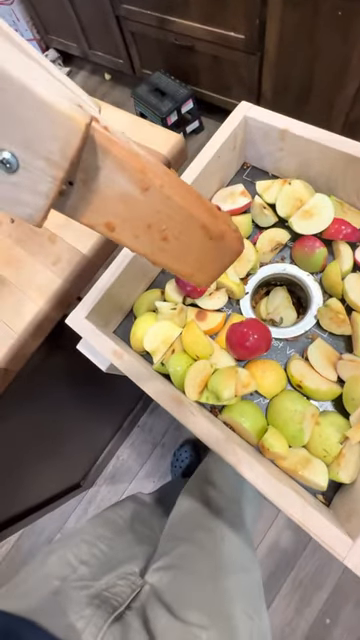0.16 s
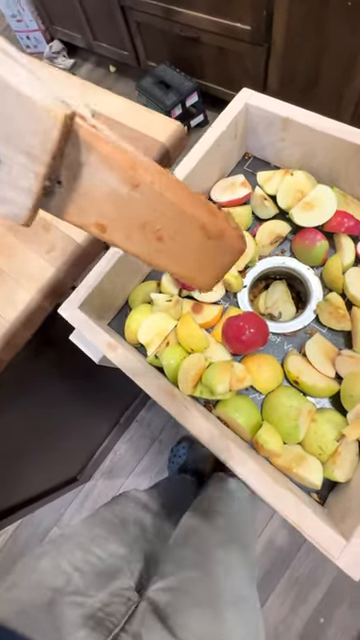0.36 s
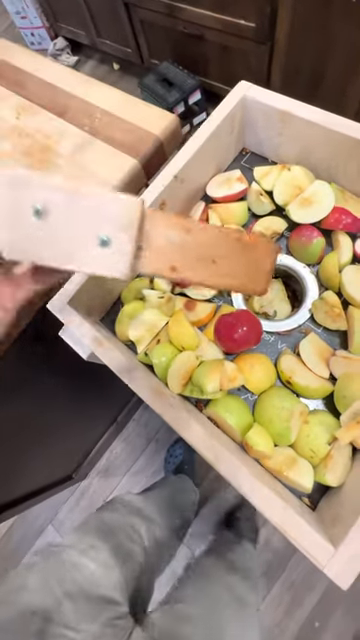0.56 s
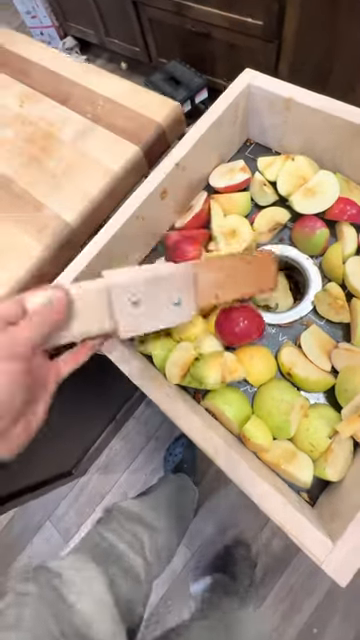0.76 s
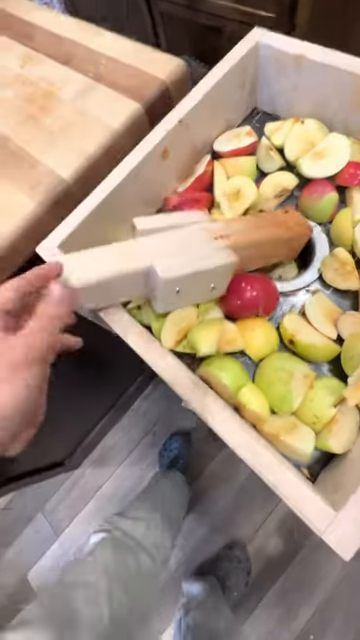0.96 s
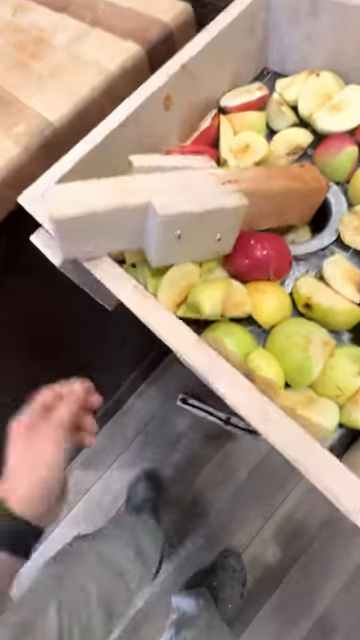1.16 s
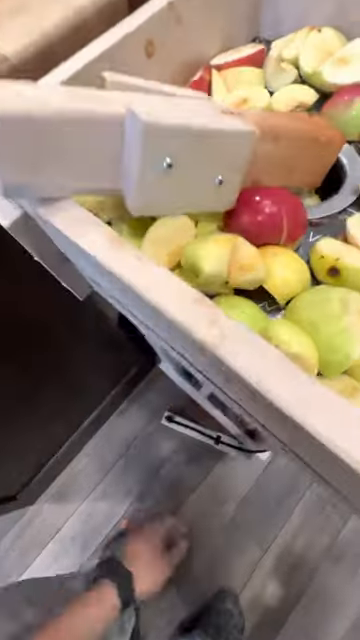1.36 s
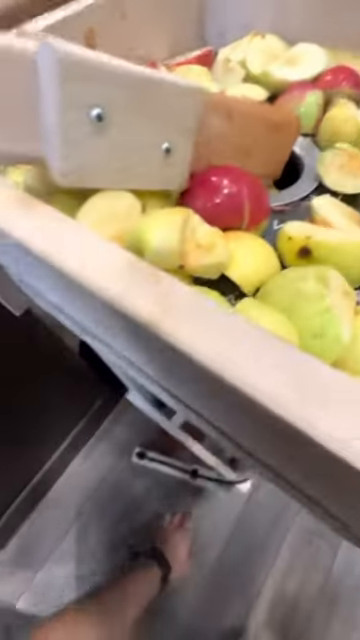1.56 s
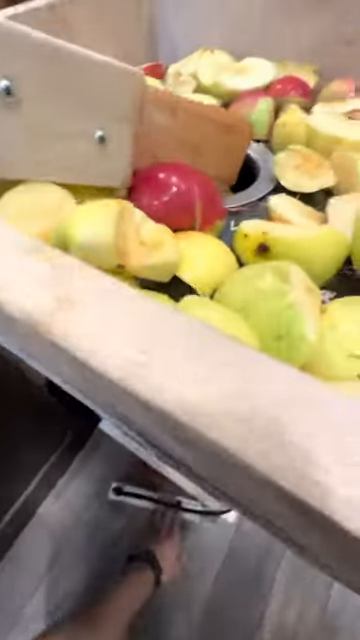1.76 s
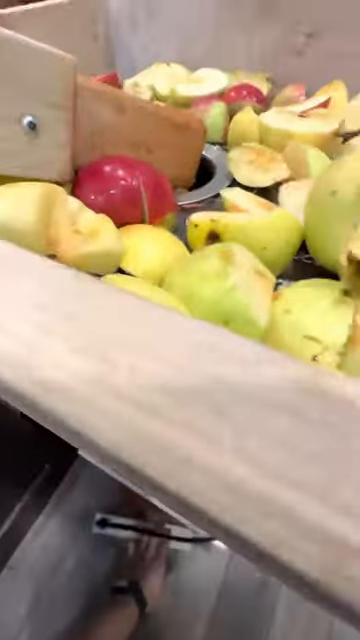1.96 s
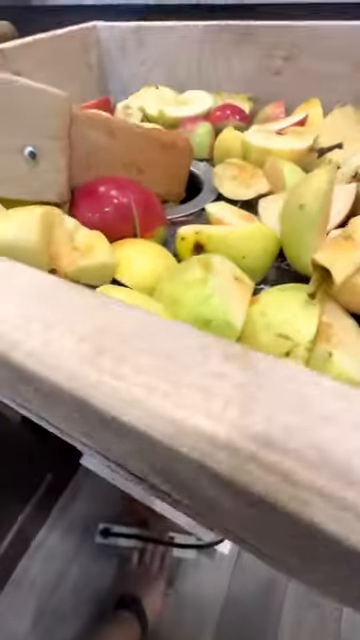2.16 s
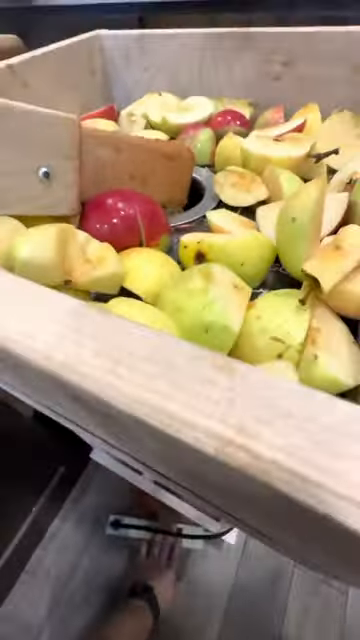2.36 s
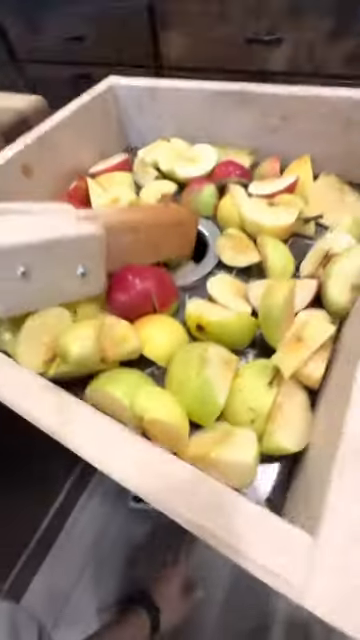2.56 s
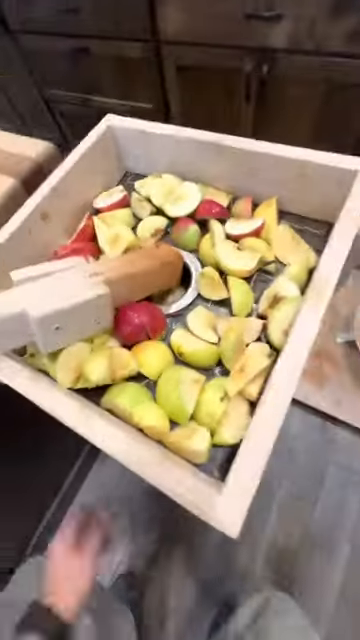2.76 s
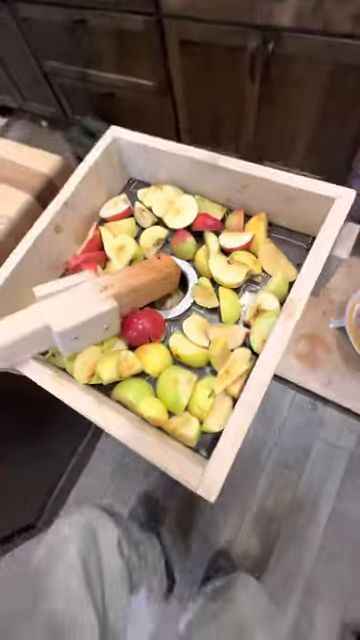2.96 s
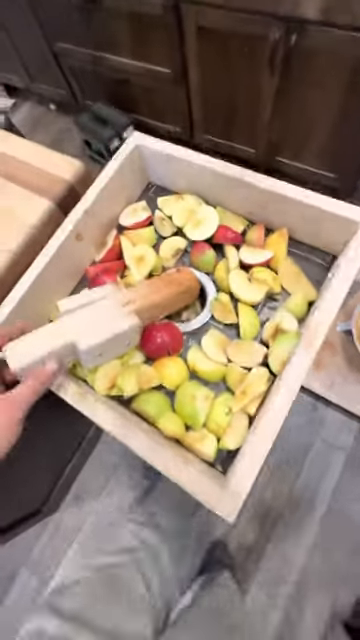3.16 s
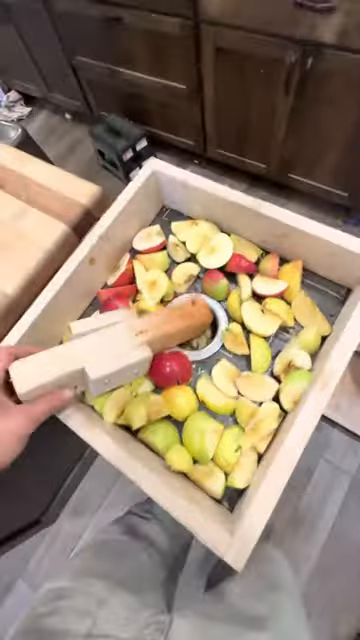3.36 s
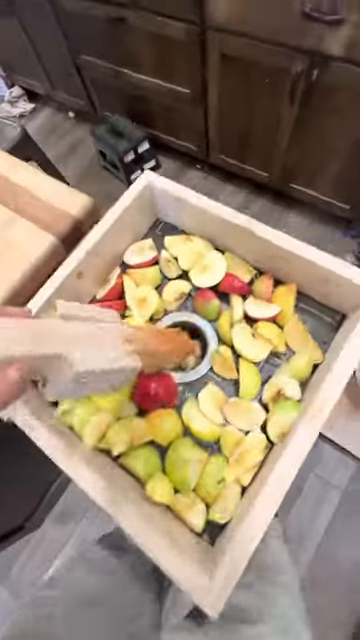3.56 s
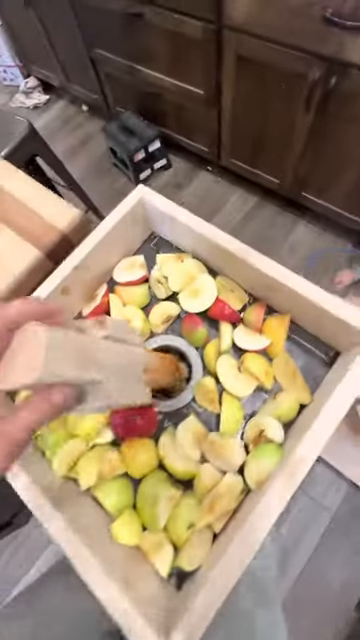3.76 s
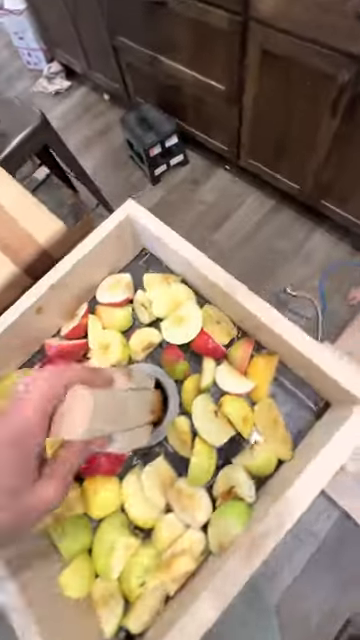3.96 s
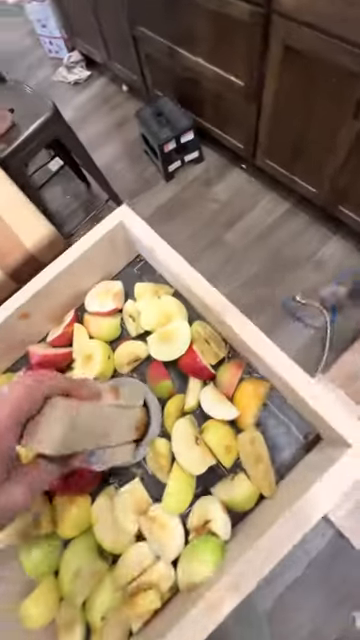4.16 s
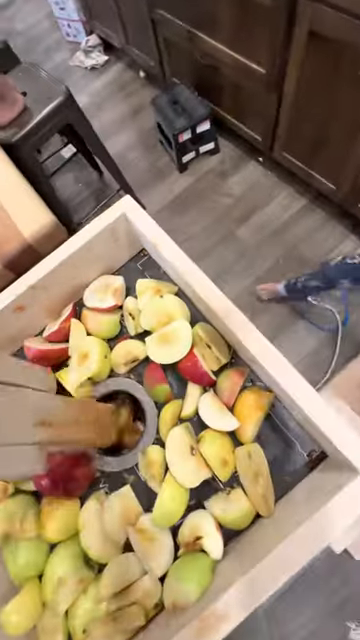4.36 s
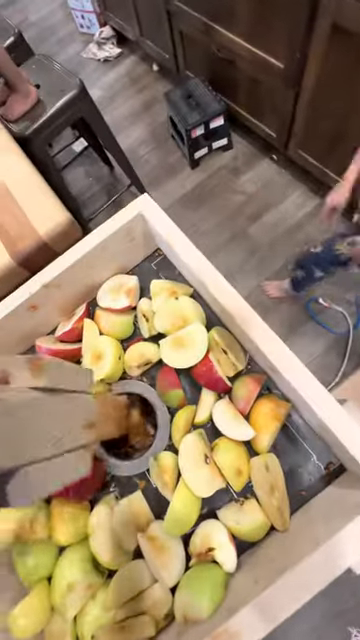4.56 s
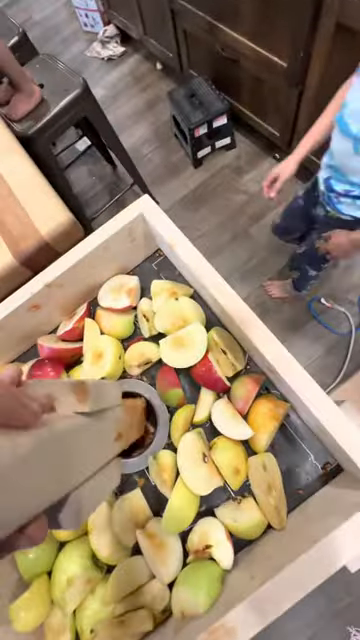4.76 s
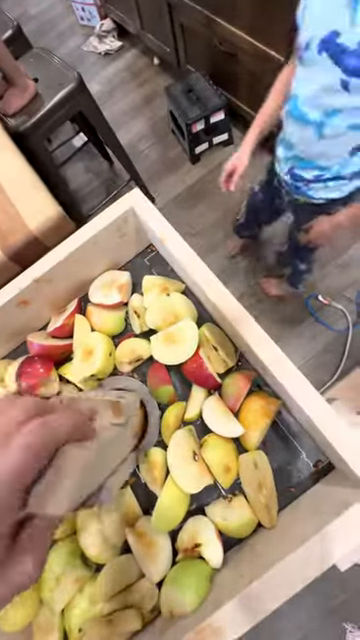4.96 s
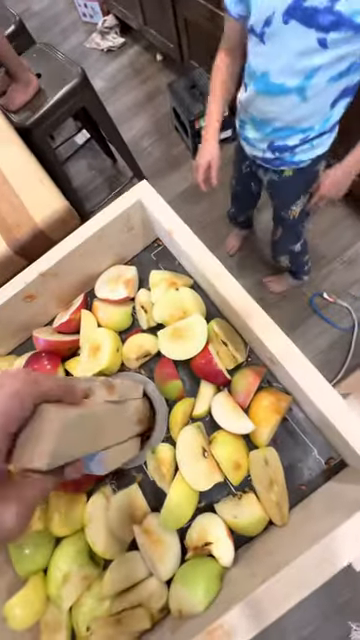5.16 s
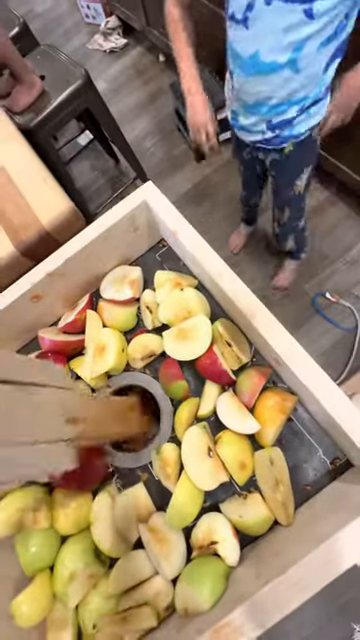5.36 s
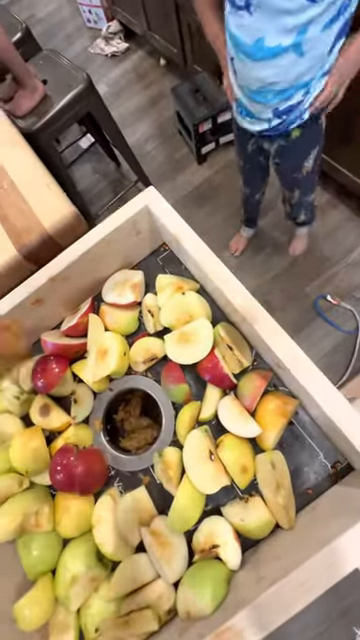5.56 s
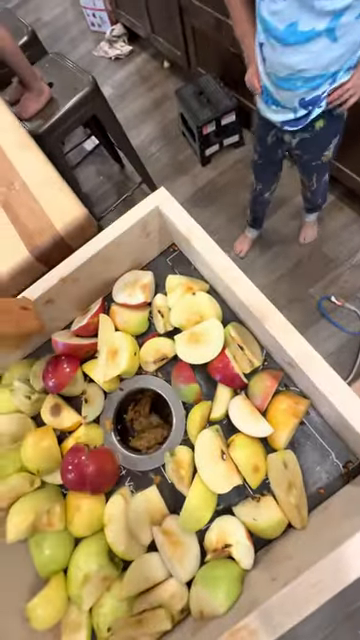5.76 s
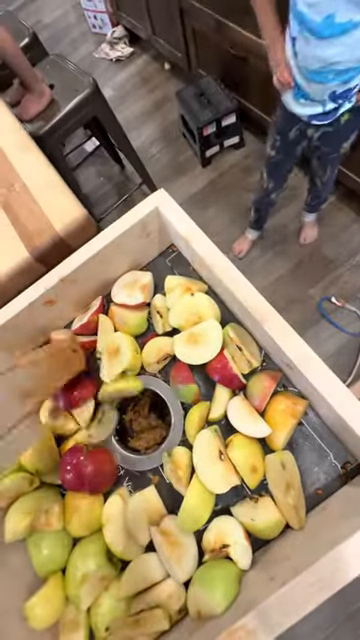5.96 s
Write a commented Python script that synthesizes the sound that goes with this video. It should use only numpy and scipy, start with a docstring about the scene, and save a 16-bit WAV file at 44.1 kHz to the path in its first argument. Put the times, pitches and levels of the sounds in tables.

```python
"""Clothes rustle and a wooden plunger knocks down into a wooden hopper of apple pieces (0.7 s).
A switch clicks (2.2 s); the garbage disposal below grinds: fruit tumbles on the plate and slams
the wall, shaking shell, chamber air and stand; juice sprays. The plate hums almost free (3.5 s).
The plunger clears the mouth (4 s), then thuds on the rim; fruit rasps, a caught piece chugs (5.3 s).
Two close microphone ports hear it in a small hard room."""
import sys
import numpy as np
from scipy import signal
from scipy.io import wavfile
from scipy.ndimage import uniform_filter1d, minimum_filter1d

SR = 44100
rng = np.random.default_rng(int(sys.argv[2]) if len(sys.argv) > 2 else 0)


def file_out(sig):
    """Save sig as 16-bit WAV at sys.argv[1]."""
    # one column per channel
    cols = np.atleast_2d(sig).T
    # limit, then scale
    lim = np.clip(cols, -1, 1)
    pcm = np.round(lim * 32767).astype(np.int16)
    wavfile.write(sys.argv[1], SR, pcm)


N = 264952

# left-right likeness: f/Hz, coherence/0-1
PORT_COHERENCE = [(100, .998), (400, .99), (650, .88), (1200, .97), (1950, .97), (2500, .7), (3200, .82),
                  (4000, .45), (5200, .2), (6300, .85), (7700, .65), (9300, .8), (15000, .9)]
# left port's lead: f/Hz, phase/rad
PORT_LEAD = [(100, 0), (2250, 0), (2750, 2.1), (3700, 3), (4600, 2.8), (5200, 6.1), (6200, 6.3),
             (7300, 5.8), (8300, 4.4), (9400, 5.1), (10400, 3.4), (15000, 3)]
# left minus right: f/Hz, level/dB
PORT_BALANCE = [(30, 0), (150, 2), (400, 3), (750, 5.5), (1200, 2), (1800, -.5), (2500, -4), (3100, 2),
                (4500, 3), (6000, -1), (8000, -2.5), (9000, 0)]
# port heading, left minus right: t/s, level/dB
PORT_HEADING = [(0, -1), (1, -1), (2.2, -1.5), (2.7, 0), (4.2, .5), (6.01, 0)]

# cloth and hands move: t/s, rise/(s per 20 dB), fall/(s per 20 dB), rustle/dB, scrape/dB
MOVES = [(0.144, 0.023, 0.1, -59.5, -52), (.43, 0.15, 1.5, -65.5, -64.5), (0.589, 0.039, 0.22, -47, -48.5),
         (0.708, 0.0028, 0.03, -49, -58), (.78, 0.0133, 5.5, -64, -60), (0.949, 0.2, 1, -53, -57.5),
         (1.116, 0.00545, -0.07, -43.5, -31), (1.211, 0.077, -0.8, -53.5, -49.5),
         (1.42, 0.37, 0.81, -50, -49.5), (1.89, 0.0117, 0.0729, -53.5, -45)]
# feet and knees bump: t/s, rise/(s per 20 dB), fall/(s per 20 dB), level/dB
STEPS = [(.075, 0.047, -0.06, -42.5), (.6, 0.049, 5.5, -51), (.76, 0.033, 0.3, -51),
         (1.16, 0.032, -0.8, -50), (1.835, 0.049, 0, -46), (1.905, 0.022, 0.21, -45.5),
         (1.975, 0.03, 0, -47), (2.16, 0.0213, .1, -44)]
# cloth: f/Hz, level/dB
RUSTLE_SPECTRUM = [(880, -50), (1500, 2.5), (1600, -13), (2270, 0), (4120, -1), (9310, -0.5), (10100, -1),
                   (11200, -28), (22000, -120)]
# feet and knees: f/Hz, level/dB
BUMP_SPECTRUM = [(15, -30.5), (25, -21), (42, -10.5), (108, -4.5), (145, -1.5), (300, -27.5), (390, -50.5),
                 (660, -120)]
# soft scrapes and wood cracks: f/Hz, level/dB
SCRAPE_SPECTRUM = [(130, -99), (220, 7), (310, -3), (576, -2.5), (789, -11), (969, -7), (2300, -17),
                   (2990, -23), (5060, -120)]

# wood on wood: t/s, level/dB, relative crack/dB, pitch/ratio
KNOCKS = [(0.703, -12.5, -13, 1.333), (0.709, 0, -20.5, 1.12), (0.767, -11.5, -33.5, 0.95),
          (0.783, -14, -13.5, 0.87), (0.914, -19, -24, 1.06), (0.885, -31, -29, 1.12),
          (0.966, -34, -34.5, 0.684), (0.987, -27.5, -33, 0.84), (1.113, -34, -28.5, 1),
          (1.124, -28, -29, 0.85), (1.198, -37, -6, 0.93)]
# plunger and hopper boards: f/Hz, level/dB, t60/s
WOOD_MODES = [(288.7, 5, 0.039), (508, 2.5, 0.017), (250, -20.5, 0.089), (380.9, -8.5, 0.087),
              (580.4, -16, 0.1095), (700, -27.5, 0.088)]
# small dry ticks: t/s, level/dB, f/Hz, t60/s
TICKS = [(0.942, -37, 2440, 0.06), (1.1086, -32, 968, 0.0372), (1.1945, -34, 1460, 0.065),
         (1.2135, -34.5, 1492, 0.037), (1.2235, -37, 1407, 0.055), (1.8877, -38, 1455, 0.033),
         (1.9522, -30, 1090, 0.024)]
# plunger on the rim: t/s, level/dB, f/Hz, t60/s
RIM_THUDS = [(4.506, 4.5, 227, 0.0425), (4.885, -6, 238.6, 0.073), (4.981, -2, 274, 0.0424),
             (5.644, -2.5, 224, 0.056)]
# large pieces hit the chamber wall: t/s, level/dB, f/Hz
WALL_SLAMS = [(2.244, -6, 330), (2.279, -4, 1000), (2.340, -17, 1280), (2.576, -6, 917),
              (2.7245, -4.5, 786), (2.866, -7.5, 520), (2.93, -6, 690), (3.040, -10, 1103),
              (3.127, -6, 720), (3.146, -3.5, 885), (3.229, -6.5, 287.6), (3.351, -12, 328),
              (3.4405, -5, 778), (3.4645, -4, 780), (3.793, -4.5, 745), (3.852, -6, 1273),
              (3.883, 1.5, 318.6), (3.902, -1, 610), (3.910, 0.5, 556), (3.939, -7, 680),
              (3.968, -5.5, 466.3), (3.995, -7.5, 398), (4.019, -2.5, 457), (4.045, -3, 306),
              (4.126, -6, 574), (4.173, -7, 520), (4.254, -7, 834.6), (4.299, -1.5, 791.4),
              (4.688, -6, 273), (4.778, -6.5, 303), (4.807, -6, 328.3), (4.971, -5, 800), (5.005, -7, 500),
              (5.259, -8, 1225), (5.356, -7, 346), (5.411, -3, 350.8), (5.462, -1.5, 350),
              (5.509, -7.5, 365), (5.532, -9, 813), (5.581, -4, 349.4), (5.664, -6, 1135), (5.696, -3, 358),
              (5.713, -7, 820), (5.781, -8, 369.2), (5.824, -8, 360), (5.955, -9, 824)]
# plunger edge twice, switch, a brief faint high click, two fruit snaps: t/s, level/dB, t60/s, f/Hz
SNAPS = [(0.7098, -27, 0.0147, 2990), (1.1092, -42.5, 0.0193, 3070), (2.198, -15.5, 0.008, 6000),
         (2.913, -25, 0.01, 5960), (5.096, -26.5, 0.011, 1690), (5.102, -22.5, 0.012, 1700)]

# plate almost free: t/s, shaft speed/Hz, level/dB
FREE_RUN = [(3.5, 60.4, -29), (3.58, 62.2, -30), (3.61, 63.6, -29), (3.748, 67.45, -25.5),
            (3.824, 68.4, -18.5), (3.88, 68.94, -28)]
# hum partials: order/multiple of shaft speed, level/dB
SHAFT_ORDERS = [(2, -10), (4, -3), (5, -11), (6, -12), (7, 2), (8, -5.5), (10, -8), (11, -12), (12, -12),
                (13, -15), (14, -23), (16, -20), (17, -15), (18, -6), (19, -12), (36, -13), (37, -18)]
# grinding load: t/s, shell/dB, mouth clatter/dB, juice spray/dB
LOAD = [(2.198, -36.5, -35, -27.5), (2.225, -22, -38, -32), (2.25, -19.5, -32, -33.5),
        (2.44, -18, -25.5, -35.5), (2.53, -18.5, -26, -34), (2.66, -18, -26.5, -34.5),
        (2.85, -19.5, -31, -35.5), (3.0, -19.5, -26, -36.5), (3.17, -16.5, -27.5, -32.5),
        (3.5, -22.5, -31.5, -39), (3.63, -33, -38, -44), (3.78, -30.5, -39, -45.5), (3.8, -22.5, -30, -38),
        (3.865, -18, -29, -38.5), (3.91, -15.5, -26.5, -33.5), (3.99, -17.5, -22.5, -33.5),
        (4.06, -26.5, -40.5, -39.5), (4.19, -29, -36.5, -45), (4.29, -21, -20.5, -27),
        (4.37, -20, -24, -30.5), (4.42, -20, -20.5, -28), (4.48, -21.5, -24, -31.5),
        (4.56, -25.5, -30.5, -30), (4.7, -25, -29.5, -30.5), (4.88, -29.5, -35, -32.5),
        (4.98, -21, -26, -36.5), (5.04, -26, -40.5, -45), (5.165, -31.5, -48, -48),
        (5.21, -25.5, -30.5, -41), (5.31, -20.5, -24, -29), (5.42, -21, -25.5, -29),
        (5.52, -20.5, -25.5, -31), (5.64, -19, -24.5, -29.5), (5.8, -23.5, -29, -33.5),
        (5.94, -23, -35, -32.5), (6.01, -27.5, -43, -39.5)]
# plunger leaves the rim: t/s, openness/0-1 (half covered to clear)
MOUTH_OPENING = [(0, 0), (3.8, 0.13), (4.2, 1), (4.9, 0.78), (5.3, 0.79), (6.01, 1)]
# piece caught on the plate: t/s, running count/chugs, depth/0-1
CHUGS = [(5.3, .77, 0.14), (5.4, 4.42, 0.5), (5.55, 10.56, 0.55), (5.75, 19.4, 0.44), (6.01, 31.2, 0.43)]
# stand rumble: f/Hz, level/dB
STAND_SPECTRUM = [(15, -62), (25, -24.5), (48, -14), (97, -13), (141, -1.5), (184, -9), (230, -2.5),
                  (300, -9.5), (510, -120)]
# plunger pushes rock the stand: t/s, rise/(s per 20 dB), fall/(s per 20 dB), level/dB
PUSHES = [(2.88, 0.077, 0.9, -34), (3.92, 0.037, 0.51, -21.5), (4.05, 0.1431, 0.15, -25),
          (4.518, 0.027, 0.4, -24), (4.99, 0.097, -0.03, -19.5), (5.04, 0.022, 0.04, -23),
          (5.652, 0.0126, -0.04, -15.5)]
# chamber air: f/Hz, level/dB
CHAMBER_SPECTRUM = [(100, -37), (170, -11), (339, -2.5), (403, -3.5), (461, 2), (509, -6), (565, -1),
                    (634, -12.5), (680, -3.5), (880, -21.5), (1500, -120)]
# chamber resonance: t/s, f/Hz, drone share/0-1, level at full load/dB
AIR_SPACE = [(2.19, 338, 0, -25), (3.5, 340, 0, -22), (3.62, 413, 0, -21.5), (3.78, 439.6, 0, -32.5),
             (3.88, 453.4, 0.01, -18.5), (3.99, 443.5, 0.02, -20), (4.07, 340.7, 0, -16),
             (4.19, 497, 0.34, -17), (4.3, 308, 0.2, -18), (4.9, 292, 0.04, -18.5), (5.1, 494, 0, -17.5),
             (5.25, 438, 0.31, -25.5), (5.3, 303, 0.4, -21), (5.36, 344.3, 0.85, -21),
             (5.86, 351.1, 0.84, -20.5), (6.01, 375, 0.3, -25)]
# juice spray: f/Hz, level/dB
SPRAY_SPECTRUM = [(1940, -42), (3300, 0.5), (3690, 3.5), (4650, 0), (5040, 3), (5590, 1), (6510, -1.5),
                  (8590, 1), (9320, 2), (10200, -2), (10600, -27), (11200, -59), (22000, -120)]
# thin top hiss: f/Hz, level/dB
HISS_SPECTRUM = [(13500, -83.5), (14400, -25), (15000, -1), (15500, -6), (16200, -10.5)]
# juice squirts: t/s, rise/(s per 20 dB), fall/(s per 20 dB), level/dB
SQUIRTS = [(2.91, 0.028, 0.14, -30), (3.83, 0.0225, 0.052, -27.5), (4.6, 0.1, 0.2, -29)]
# shell, mouth half covered: f/Hz, level/dB
SHELL_COVERED = [(330, -21.5), (560, 3.5), (617, -6), (691, -4.5), (784, -1.5), (973, -8), (1270, -3),
                 (1480, -7.5), (1800, -29.5), (2340, -37.5), (3960, -120)]
# shell, mouth clear: f/Hz, level/dB
SHELL_CLEAR = [(330, -32.5), (560, -3.5), (633, -22.5), (820, 2.5), (899, -1.5), (987, -16), (1160, -2.5),
               (1590, -7.5), (1800, -8.5), (2340, -21), (3960, -120)]
# clatter, mouth half covered: f/Hz, level/dB
MOUTH_COVERED = [(940, -41), (1600, -5), (1720, -13), (1950, -7), (2360, -7), (2810, -3), (3200, -5),
                 (3400, -14), (3800, -15), (4940, -23), (8360, -120)]
# clatter, mouth clear: f/Hz, level/dB
MOUTH_CLEAR = [(940, -15), (1600, -17.5), (1900, -11), (2120, -20.5), (2370, -7), (2990, -0.5), (3400, -7),
               (3600, -14.5), (4000, -15), (5200, -37), (8800, -120)]
# fruit shredded on the ring: t/s, f/Hz, level/dB
RASP = [(4.22, 3346, -58), (4.27, 3281, -25), (4.31, 3020, -37), (4.37, 3080, -38), (4.42, 2870, -38),
        (4.48, 3199, -26.5), (4.58, 3322, -27), (4.72, 3394, -42), (4.8, 3350, -54), (4.86, 3520, -33),
        (4.95, 3430, -64)]
# steel parts: f/Hz, width/Hz, level half covered/dB, level clear/dB
STEEL_MODES = [(789, 25, -8, -6), (1097, 32, -1, -11), (1996, 16, -12.5, -23.5), (2471, 29, -3, -4.5),
               (3101, 106.5, -9, -3), (3400, 170, -17, -1.5), (3954, 44, -2, -7.5), (4355, 36, -10, 2.5),
               (5010, 45, -1, -2.5), (5184, 22, -14.5, -9), (5998, 46, -0.5, -2), (6515, 50, -10.5, 9.5)]

RUSTLE_FLOOR_DB, BUMP_FLOOR_DB, SCRAPE_FLOOR_DB = -69, -60.5, -64
SLAM_T60_S, ROOM_T60_S = 0.0452, 0.433
LOADED_HZ, SPEED_WANDER = 63.8, 0.02
BUZZ_LOADED, BUZZ_FREE, BUZZ_MEMORY_TURNS = 0.84, 1.6, 7.4
FULL_LOAD_DB, STAND_DB = -20, -37.5
STAND_DB_PER_DB, AIR_DB_PER_DB = 0.8, 0.78  # slopes against load
HISS_DB, HISS_DB_PER_DB, STRONG_SPRAY_DB = -32, 1.4, -35
HISS_FULL_FROM_S, HISS_EARLY_CUT_DB = 4.45, 17
HIGHPASS_HZ, LOWPASS_HZ, CEILING = 42, 15900, 0.93
FRAMES = dict(nperseg=512, noverlap=384)
TIME_S = np.arange(N) / SR


def gain_of(db):
    """Decibels to amplitude."""
    return 10 ** (np.asarray(db) / 20)


def unit_rms(x):
    """Scale to rms 1."""
    return x / np.sqrt(np.mean(x ** 2) + 1e-20)


def noise(samples=N):
    """White noise."""
    return rng.standard_normal(samples)


def wander(samples):
    """Smoothed noise, rms 1."""
    return unit_rms(uniform_filter1d(noise(), samples))


def at_hz(points, hz):
    """Interpolate over log frequency."""
    f, value = np.transpose(points)
    return np.interp(np.log(hz + 1), np.log(f + 1), value)


def curves(rows):
    """Each value column at every sample."""
    times_s, *values = np.transpose(rows)
    return [np.interp(TIME_S, times_s, v) for v in values]


def gate(rows):
    """1 from first row to last, else 0."""
    return ((TIME_S >= rows[0][0]) & (TIME_S <= rows[-1][0])).astype(float)


def swells(floor_db, rows):
    """Gain of peaks over a floor; powers add."""
    power = gain_of(2 * floor_db)
    for peak_s, rise_s, fall_s, db in rows:
        t = TIME_S - peak_s
        drop_db = 20 * np.where(t < 0, -t / abs(rise_s), t / abs(fall_s))
        power = power + gain_of(2 * (db - drop_db))
    return np.sqrt(power)


def add(mix, start_s, sound):
    """Mix in at start_s."""
    part = mix[round(start_s * SR):][:len(sound)]
    part += sound[:len(part)]


def colour(x, spectrum):
    """Minimum-phase filter; output rms 1."""
    db = np.maximum(at_hz(spectrum, abs(np.fft.fftfreq(8192, 1 / SR))), -100)
    response = np.exp(np.conj(signal.hilbert(np.log(gain_of(db)))))
    taps = np.fft.ifft(response).real[:4096]
    return unit_rms(signal.oaconvolve(x, taps)[:N])


def resonate(x, hz, *widths_hz):
    """Tunable unity-gain resonances in series, one per width."""
    carrier = np.exp(2j * np.pi * np.cumsum(hz * np.ones(len(x))) / SR)
    for width_hz in widths_hz:
        pole = np.exp(-np.pi * width_hz / SR)
        x = 2 * (carrier * signal.lfilter([1 - pole], [1, -pole], x / carrier)).real
    return x


def blows(per_s, spread_db, burst_s):
    """Random uneven blows, each a swelling and dying noise burst."""
    sizes = gain_of(spread_db * np.minimum(rng.exponential(1, N), 3))
    struck = rng.random(N) < per_s / SR
    pole = np.exp(-1 / (burst_s * SR))
    envelope = signal.lfilter([1], [1, -2 * pole, pole * pole], sizes * struck)
    return unit_rms(envelope * noise())


def random_flicker(x, depth_db, frames, bins):
    """Spectral patches swell and fade at random; output rms 1."""
    spectra = signal.stft(x, **FRAMES)[2]
    patches = uniform_filter1d(rng.standard_normal(spectra.shape), bins, axis=0)
    patches = unit_rms(uniform_filter1d(patches, frames, axis=1))
    return unit_rms(signal.istft(spectra * gain_of(depth_db * patches), **FRAMES)[1][:N])


def room(x):
    """Hard walls: sparse decaying echoes of random sign, energy 1."""
    taps, slots = np.zeros(16000), np.arange(200, 15980, 20)
    taps[slots + rng.integers(0, 20, len(slots))] = rng.choice([-1., 1.], len(slots))
    taps *= gain_of(-60 * TIME_S[:len(taps)] / ROOM_T60_S)
    return signal.oaconvolve(x, taps / np.linalg.norm(taps))[:N]


def ports(x, diffuse_hz):
    """Right port gets a phase-shifted copy plus scatter; coherence drops around diffuse_hz."""
    hz, t, left = signal.stft(x, SR, **FRAMES)
    diffuse = 5.9 * diffuse_hz * hz / (hz ** 2 + diffuse_hz ** 2 + 1)
    coherence = np.clip(at_hz(PORT_COHERENCE, hz) * (1 - diffuse), 0, 1)[:, None]
    scatter = 2 * left * np.exp(2j * np.pi * rng.random(left.shape))  # random frames lose 6 dB
    lag = np.exp(-1j * at_hz(PORT_LEAD, hz))[:, None]
    right = coherence * lag * left + np.sqrt(1 - coherence ** 2) * scatter
    balance_db = at_hz(PORT_BALANCE, hz)[:, None] + np.interp(t, *np.transpose(PORT_HEADING))
    lean = gain_of(balance_db / 2)
    return signal.istft(np.array([left * lean, right / lean]), **FRAMES)[1][:, :N]


def body_movement():
    """Cloth rustles, feet and knees bump, hands scrape."""
    fibres = blows(380, spread_db=-6.5, burst_s=0.0023) + 1.86 * noise()
    rustle = colour(fibres, RUSTLE_SPECTRUM) * swells(RUSTLE_FLOOR_DB, [m[:4] for m in MOVES])
    bumps = colour(fibres, BUMP_SPECTRUM) * swells(BUMP_FLOOR_DB, STEPS)
    scrape_gain = swells(SCRAPE_FLOOR_DB, [m[:3] + m[4:] for m in MOVES])
    return rustle + bumps + colour(fibres, SCRAPE_SPECTRUM) * scrape_gain


def wood_knocks():
    """Plunger and hopper boards ring; hard contacts add a crack."""
    out, t = np.zeros(N), TIME_S[:12000]
    for start_s, db, crack_db, pitch in KNOCKS:
        bent_s = pitch * (t + 0.00087 * (1 - np.exp(-t / 0.0057)))  # starts sharp, settles
        ring = sum(gain_of(mode_db - 60 * t / t60_s) * np.sin(2 * np.pi * hz * bent_s)
                   for hz, mode_db, t60_s in WOOD_MODES)
        ring *= 1 - np.exp(-(t / 0.0021) ** 2)  # boards take time to bend
        crack = gain_of(crack_db - 60 * t / 0.0343) * colour(noise(len(t)), SCRAPE_SPECTRUM)[:len(t)]
        add(out, start_s, gain_of(db) * (ring / abs(ring).max() + crack))
    return out


def thumps(rows, ring_share, rise_s, glide, spread=0.52):
    """Dying ring plus noise burst; glide raises the pitch at the stiff first contact."""
    out, t = np.zeros(N), TIME_S[:8000]
    for start_s, db, hz, t60_s in rows:
        burst = unit_rms(resonate(noise(len(t)), hz, spread * hz, 2 * spread * hz))
        cycles = np.cumsum(hz * (1 + glide * np.exp(-t / 0.0018))) / SR
        tone = ring_share * np.sin(2 * np.pi * cycles) + (1 - ring_share) * burst
        envelope = gain_of(db - 60 * t / t60_s) * (1 - np.exp(-t / rise_s))
        add(out, start_s, envelope * tone)
    return out


def impacts():
    """Knocks, slams, ticks and thuds; wood and fruit give little deep bass or top."""
    slams = [(*row, SLAM_T60_S) for row in WALL_SLAMS]
    hits = wood_knocks() + thumps(slams, ring_share=0.8, rise_s=0.0021, glide=0.62)
    hits += thumps(TICKS, ring_share=0.405, rise_s=0.00048, glide=0, spread=0.67)
    hits += thumps(RIM_THUDS, ring_share=0.86, rise_s=0.00155, glide=2.464)
    return signal.sosfilt(signal.butter(4, [120, 9000], "band", fs=SR, output="sos"), hits)


def snaps():
    """Dry snaps and clicks: brief wideband noise bursts."""
    out, t = np.zeros(N), TIME_S[:3000]
    for start_s, db, t60_s, hz in SNAPS:
        burst = unit_rms(resonate(noise(len(t)), hz, 0.62 * hz))
        add(out, start_s, gain_of(db - 60 * t / t60_s) * burst)
    return out


def shaft_hum():
    """The lightly loaded plate hums in wavering shaft orders."""
    hz, db = curves(FREE_RUN)
    turns = np.cumsum(hz) / SR + 0.0067 * wander(900)
    hum = sum(gain_of(order_db) * np.sin(2 * np.pi * (order * turns + rng.random()))
              for order, order_db in SHAFT_ORDERS)
    return uniform_filter1d(gate(FREE_RUN), 2000) * gain_of(db) * unit_rms(hum)


def stand_rumble(tumble, load_db):
    """Load and plunger pushes rock the stand."""
    rocking = swells(STAND_DB + STAND_DB_PER_DB * load_db, PUSHES)
    return colour(0.76 * tumble + noise(), STAND_SPECTRUM) * rocking


def chamber_air(drive, load_db):
    """Stirred air drones at a resonance that the plunger retunes."""
    hz, drone_share, full_db = curves(AIR_SPACE)
    stirred = colour(drive, CHAMBER_SPECTRUM)
    drone = resonate(stirred, hz, 52, 52)
    power = uniform_filter1d(drone ** 2, 1500) + 1e-9
    drone = unit_rms(drone / power ** 0.22)  # constant stirring sustains it
    air = np.sqrt(drone_share) * drone + np.sqrt(1 - drone_share) * stirred
    return air * gain_of(full_db + AIR_DB_PER_DB * load_db)


def thin_hiss(churn, spray_db):
    """Patches of thin, very high hiss swell and fade; rises with the spray, fainter early on."""
    db = HISS_DB + HISS_DB_PER_DB * np.minimum(spray_db - STRONG_SPRAY_DB, 0)
    db -= HISS_EARLY_CUT_DB * (TIME_S < HISS_FULL_FROM_S)
    return gain_of(db) * random_flicker(colour(churn, HISS_SPECTRUM), depth_db=6, frames=12, bins=47)


def juice_spray(drive, spray_db):
    """Juice hisses, with sudden squirts."""
    spray = random_flicker(colour(drive, SPRAY_SPECTRUM), depth_db=3, frames=5, bins=4)
    return spray * swells(spray_db, SQUIRTS)


def shredding_rasp(clatter):
    """Fruit pressed on the ring shreds with a ringing rasp."""
    hz, db = curves(RASP)
    return gate(RASP) * gain_of(db) * unit_rms(resonate(clatter, hz, 160, 170))


def lug_buzz(turns, spots=700):
    """Lugs rub the same spots of the ring each turn: a slowly changing noise loop."""
    memory = np.exp(-1 / BUZZ_MEMORY_TURNS)
    roughness = rng.standard_normal((int(90 * N / SR), spots))  # one row per turn
    pattern = signal.lfilter([1], [1, -memory], roughness, axis=0).ravel()
    buzz = unit_rms(np.interp(turns * spots, np.arange(len(pattern)), pattern))
    free = uniform_filter1d(gate(FREE_RUN), 3000)
    return buzz * (BUZZ_LOADED + (BUZZ_FREE - BUZZ_LOADED) * free)


def plunger_cover(x, openness, covered, clear):
    """The spectrum crossfades as the plunger clears the mouth."""
    return (1 - openness) * colour(x, covered) + openness * colour(x, clear)


def steel_ringing(x, openness, step_s=0.1, waver_db=2.5):
    """Ring, plate and shell add narrow modes; levels waver as pulp covers them."""
    knots_s = np.arange(0, N / SR + 2 * step_s, step_s)
    out = x.copy()
    for hz, width_hz, covered_db, clear_db in STEEL_MODES:
        pulp_db = np.interp(TIME_S, knots_s, waver_db * noise(len(knots_s)))
        db = covered_db + openness * (clear_db - covered_db) + pulp_db
        out += gain_of(db) * resonate(x, hz, width_hz)
    return out


def grinder():
    """Pieces tumble on the plate; the same blows shake shell, mouth, chamber air and stand."""
    shell_db, mouth_db, spray_db = curves(LOAD)
    load_db = shell_db - FULL_LOAD_DB
    openness, = curves(MOUTH_OPENING)
    chug_count, chug_depth = curves(CHUGS)
    chug = 1 + gate(CHUGS) * chug_depth * np.cos(2 * np.pi * chug_count)

    free_hz, _ = curves(FREE_RUN)
    loaded_hz = LOADED_HZ * (1 + SPEED_WANDER * wander(4000))
    turns = np.cumsum(np.where(gate(FREE_RUN), free_hz, loaded_hz)) / SR
    buzz = lug_buzz(turns)
    sweep = 1 + 0.15 * np.cos(2 * np.pi * turns)  # load passes one side each turn
    churn = noise()
    tumble = sweep * (blows(500, spread_db=3.5, burst_s=0.001664) + 0.75 * churn)
    shake = tumble + 0.59 * churn + buzz
    clatter = 0.93 * tumble + 0.73 * churn + buzz

    stand = stand_rumble(tumble, load_db)
    air = chug * chamber_air(tumble + 0.44 * churn, load_db)
    shell = plunger_cover(shake, openness, SHELL_COVERED, SHELL_CLEAR)
    mouth = plunger_cover(clatter, openness, MOUTH_COVERED, MOUTH_CLEAR)
    # moving pulp makes shell and mouth flicker
    grind = chug * random_flicker(shell, depth_db=1.85, frames=16, bins=3) * gain_of(shell_db)
    grind += random_flicker(mouth, depth_db=2.2, frames=19, bins=4) * gain_of(mouth_db)
    grind += juice_spray(0.25 * tumble + churn + 0.23 * buzz, spray_db)
    grind += shredding_rasp(clatter)
    hiss = thin_hiss(churn, spray_db)
    running = gate(LOAD)
    return gain_of(-1.5) * steel_ringing(running * grind, openness) + running * (stand + air + hiss)


def scene():
    """Disposal and impacts close, body movement diffuse; only impacts echo."""
    hits = impacts()
    near = grinder() + shaft_hum() + snaps() + hits + gain_of(-10) * room(hits)
    return ports(near, diffuse_hz=0) + ports(body_movement(), diffuse_hz=826.6)


def record(dry):
    """Microphone bass roll-off, peak limiter, band limit."""
    thinned = signal.sosfilt(signal.butter(3, HIGHPASS_HZ, "high", fs=SR, output="sos"), dry)
    allowed = CEILING / np.maximum(abs(thinned).max(0), CEILING)
    held = minimum_filter1d(allowed, 401)
    limiter_gain = uniform_filter1d(uniform_filter1d(held, 201), 201)
    lowpass = signal.firwin(511, LOWPASS_HZ, window=("kaiser", 9), fs=SR)
    return signal.oaconvolve(thinned * limiter_gain, lowpass[None], "same")


dry = scene()
out = record(dry)
file_out(out)
```